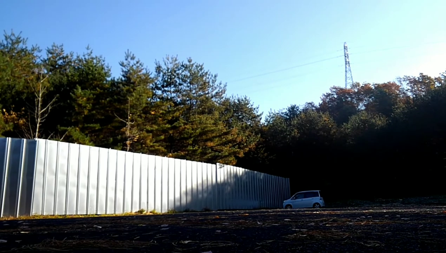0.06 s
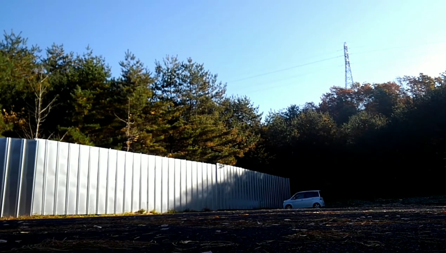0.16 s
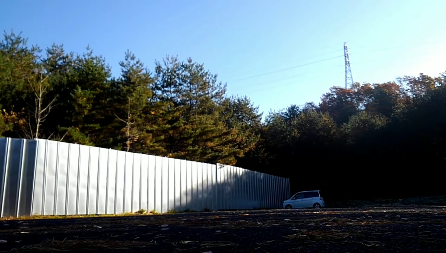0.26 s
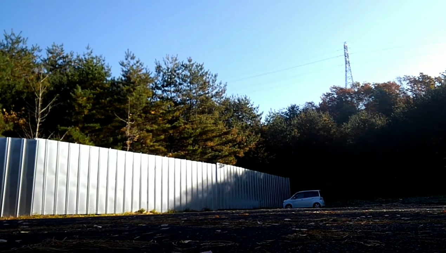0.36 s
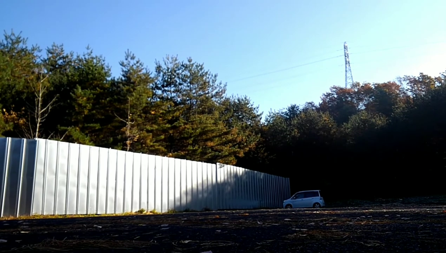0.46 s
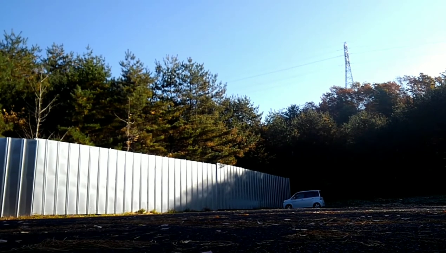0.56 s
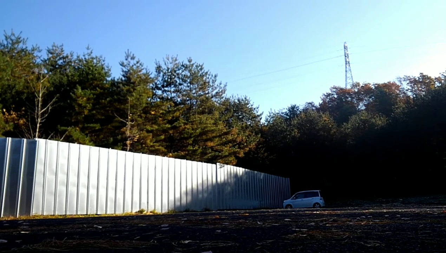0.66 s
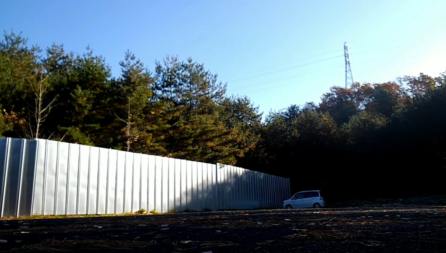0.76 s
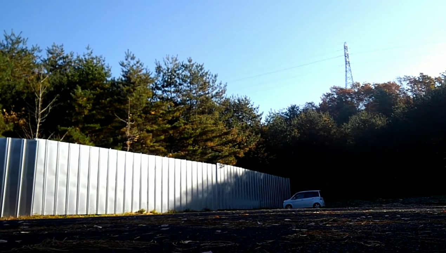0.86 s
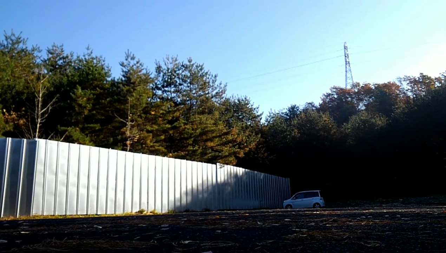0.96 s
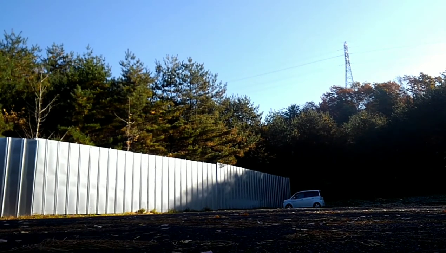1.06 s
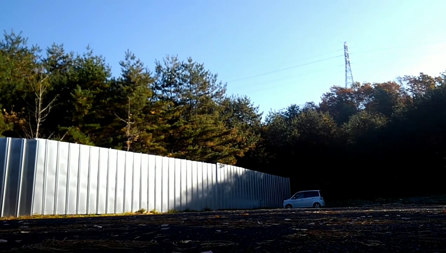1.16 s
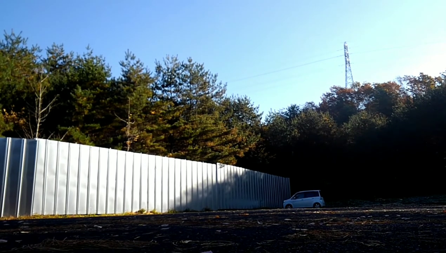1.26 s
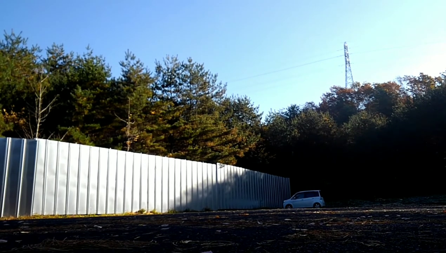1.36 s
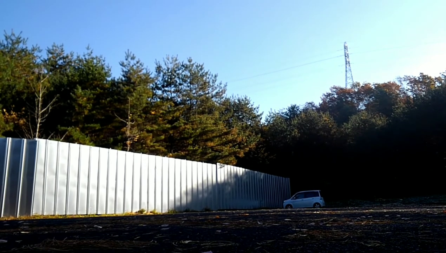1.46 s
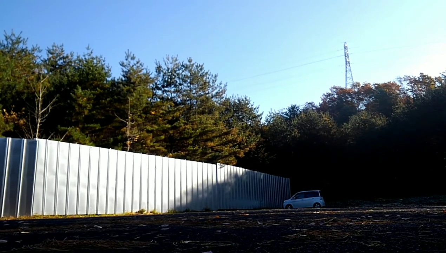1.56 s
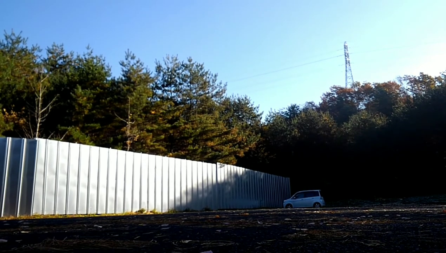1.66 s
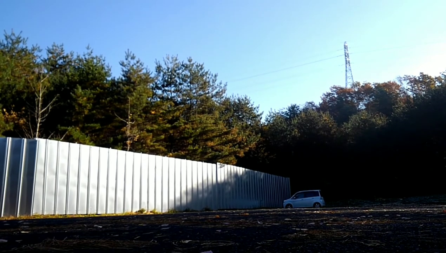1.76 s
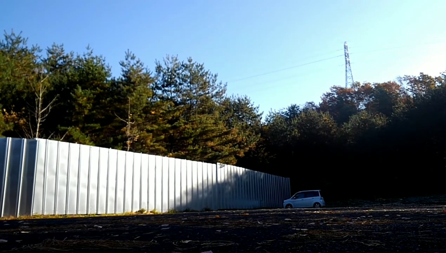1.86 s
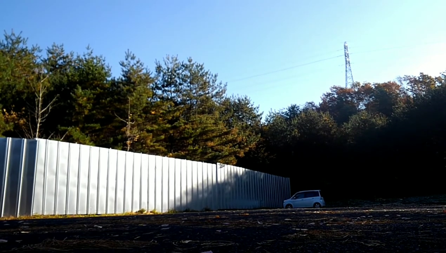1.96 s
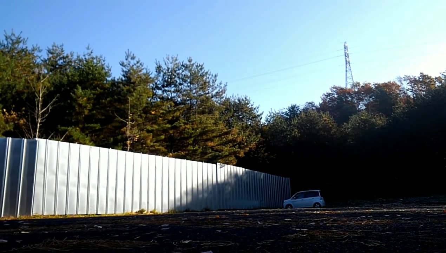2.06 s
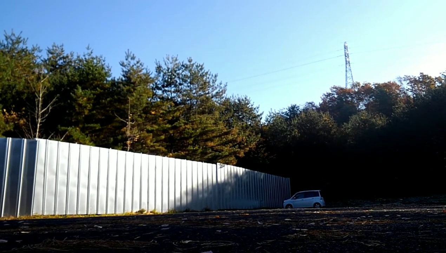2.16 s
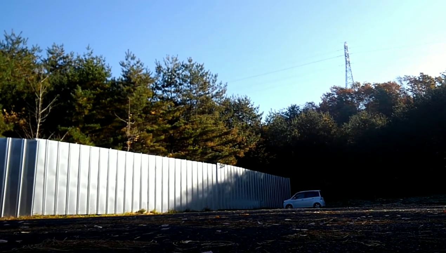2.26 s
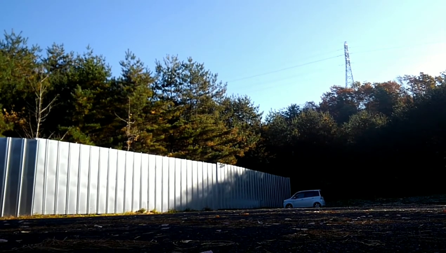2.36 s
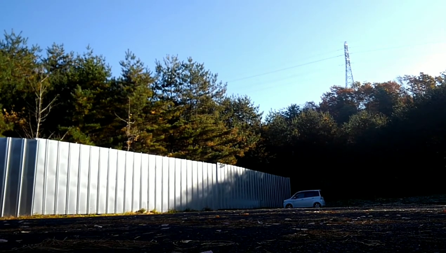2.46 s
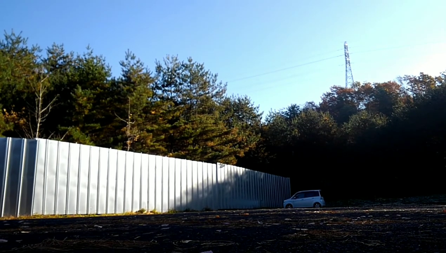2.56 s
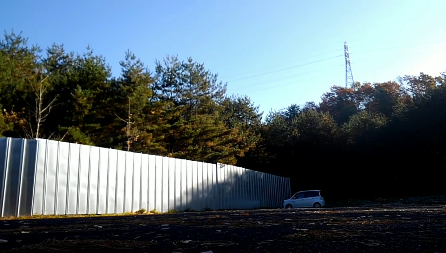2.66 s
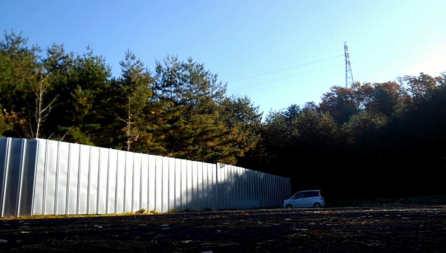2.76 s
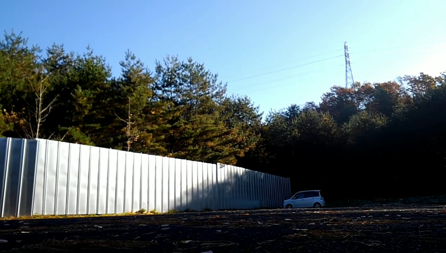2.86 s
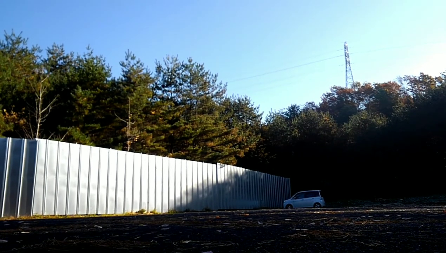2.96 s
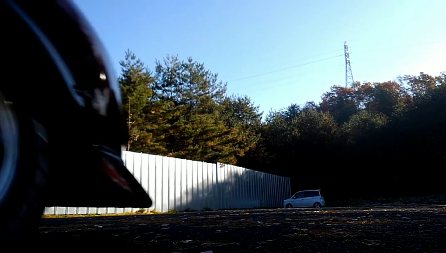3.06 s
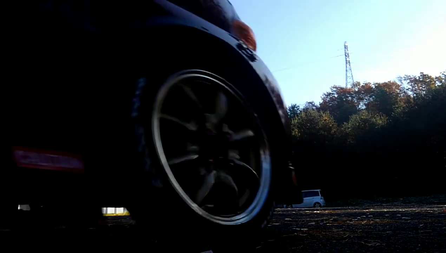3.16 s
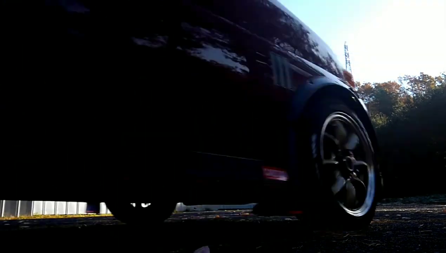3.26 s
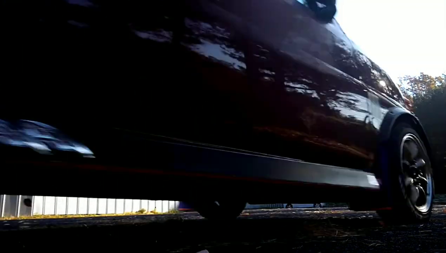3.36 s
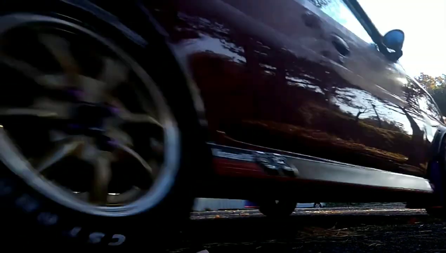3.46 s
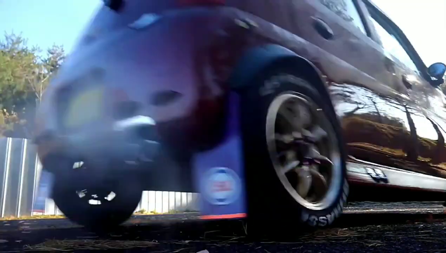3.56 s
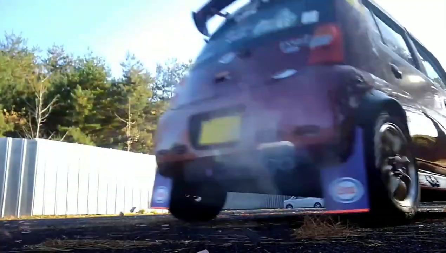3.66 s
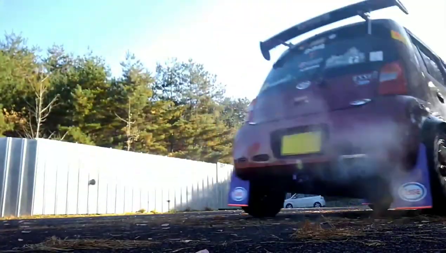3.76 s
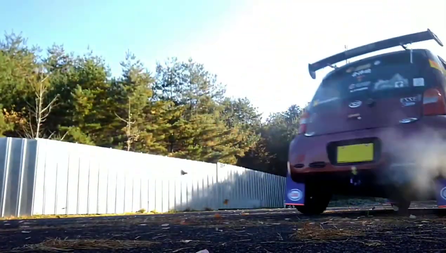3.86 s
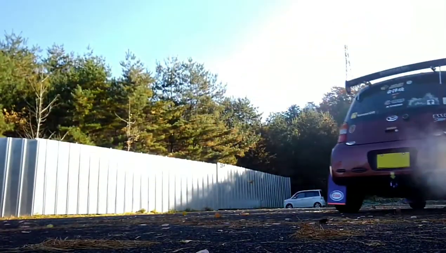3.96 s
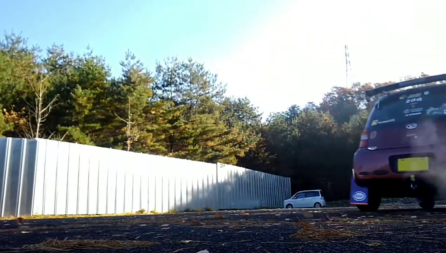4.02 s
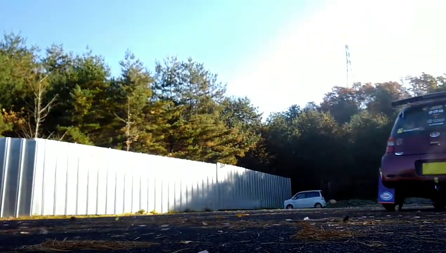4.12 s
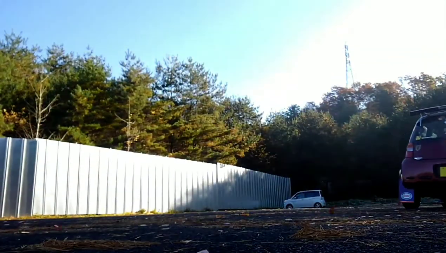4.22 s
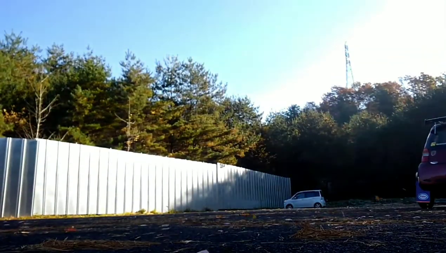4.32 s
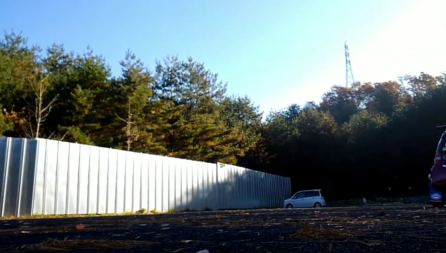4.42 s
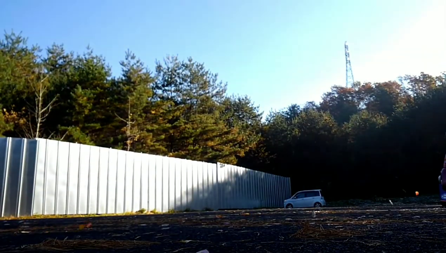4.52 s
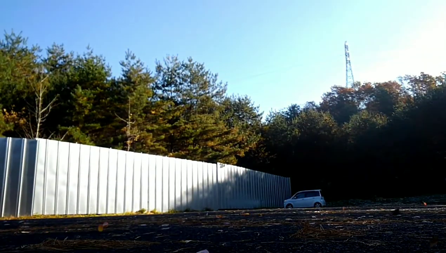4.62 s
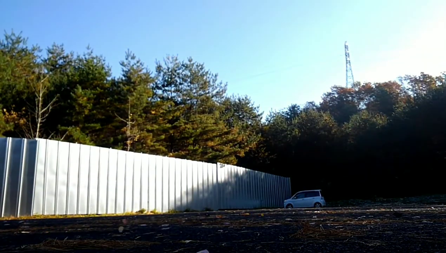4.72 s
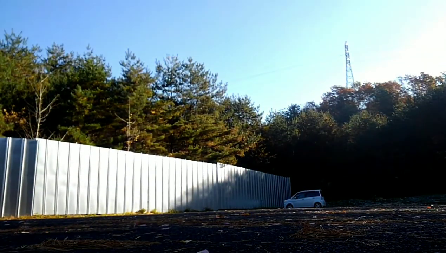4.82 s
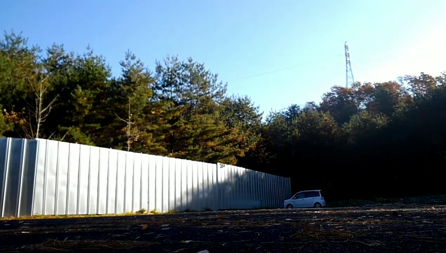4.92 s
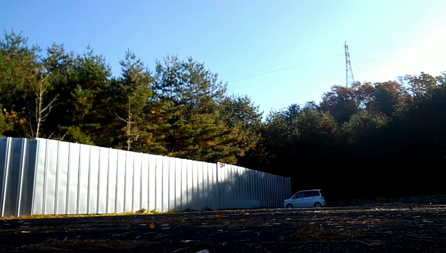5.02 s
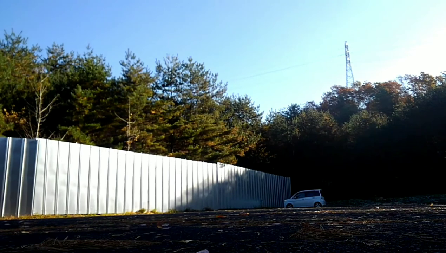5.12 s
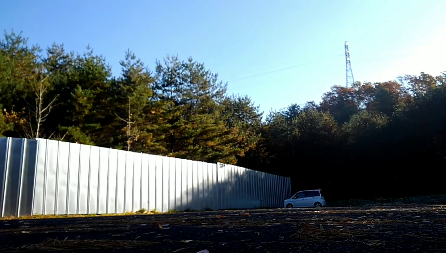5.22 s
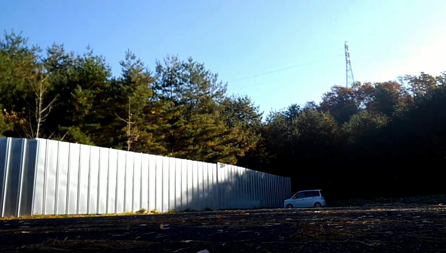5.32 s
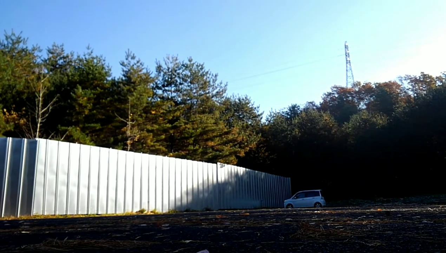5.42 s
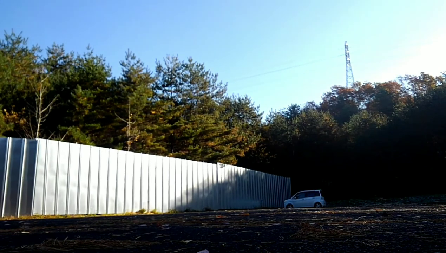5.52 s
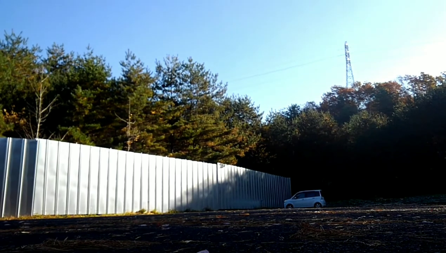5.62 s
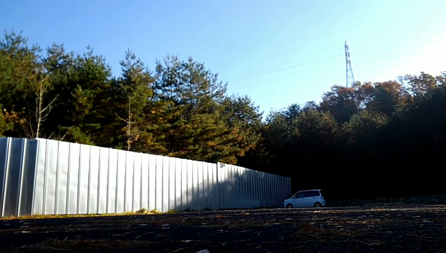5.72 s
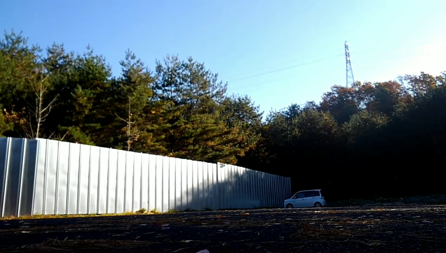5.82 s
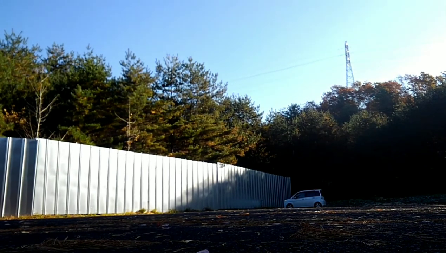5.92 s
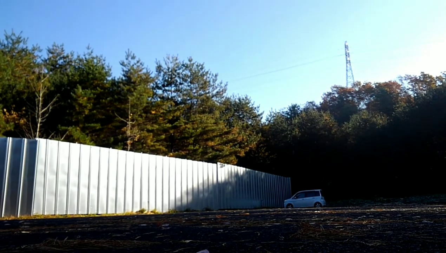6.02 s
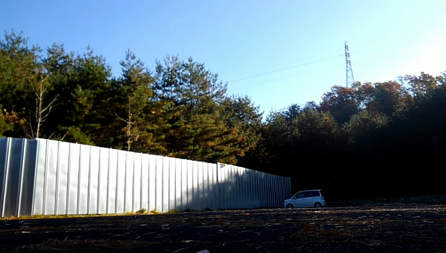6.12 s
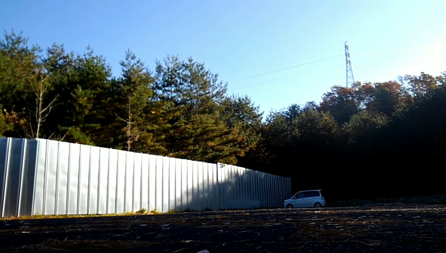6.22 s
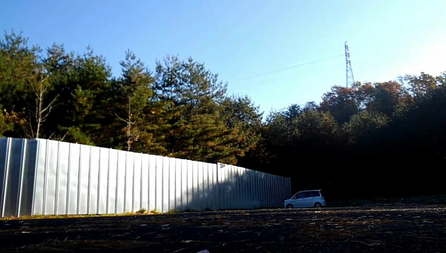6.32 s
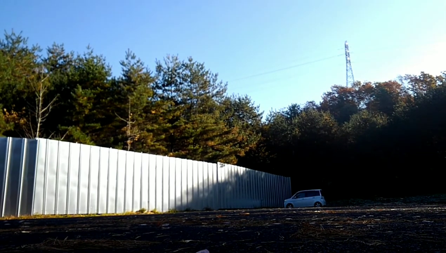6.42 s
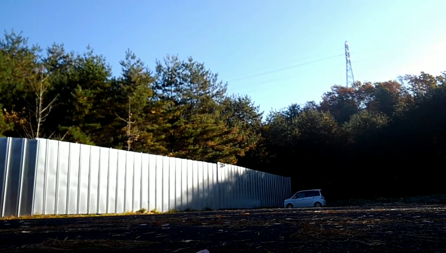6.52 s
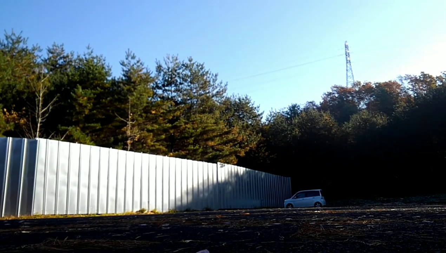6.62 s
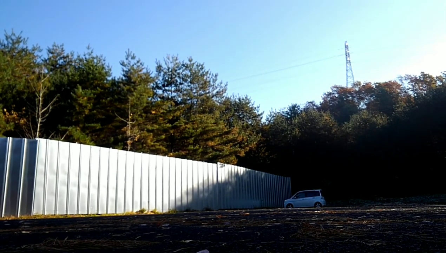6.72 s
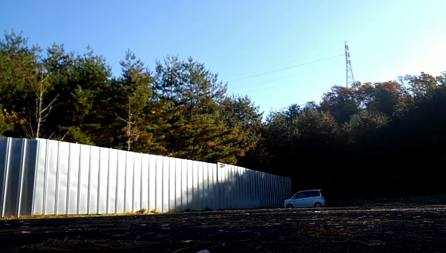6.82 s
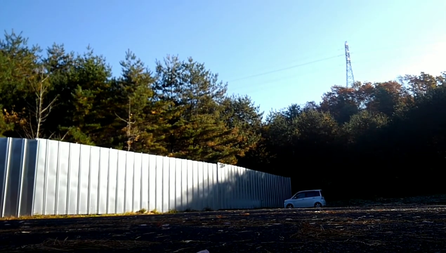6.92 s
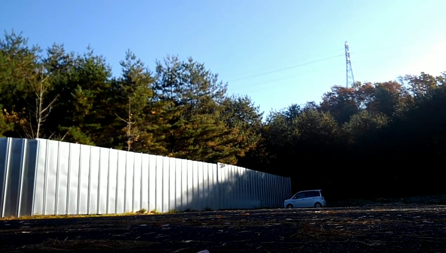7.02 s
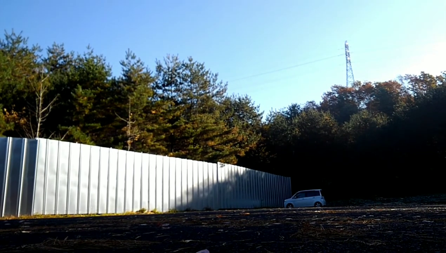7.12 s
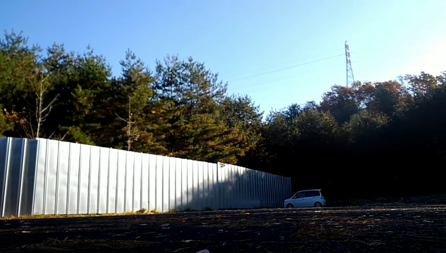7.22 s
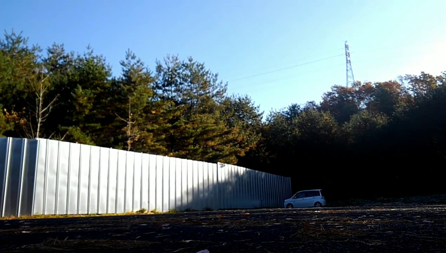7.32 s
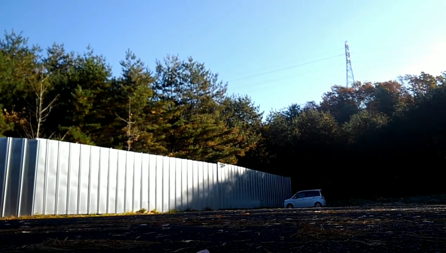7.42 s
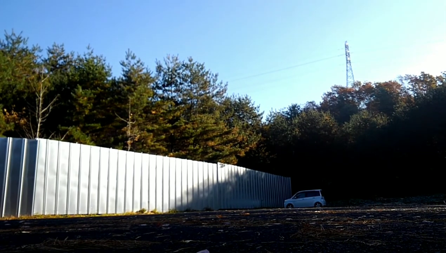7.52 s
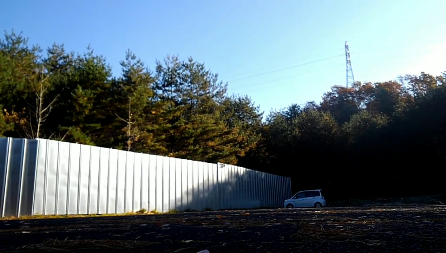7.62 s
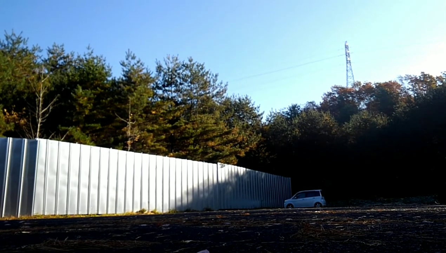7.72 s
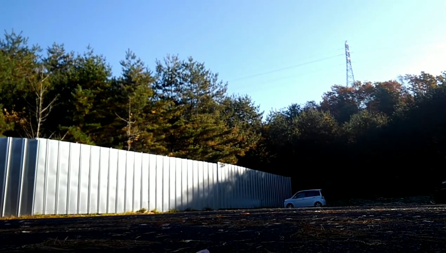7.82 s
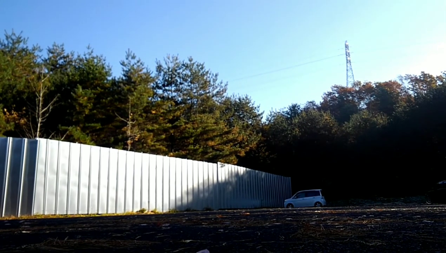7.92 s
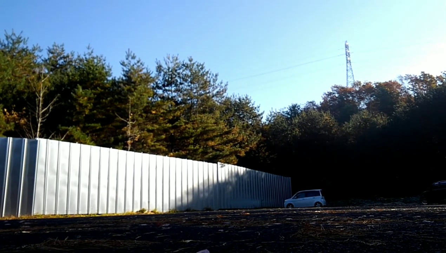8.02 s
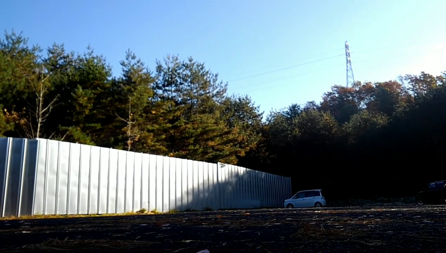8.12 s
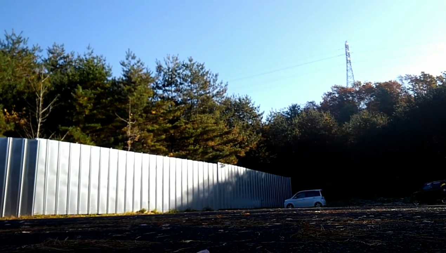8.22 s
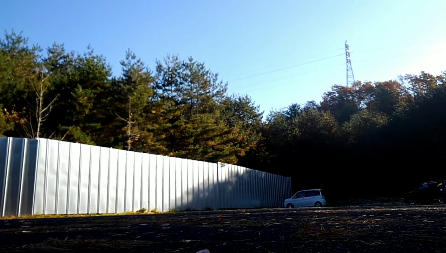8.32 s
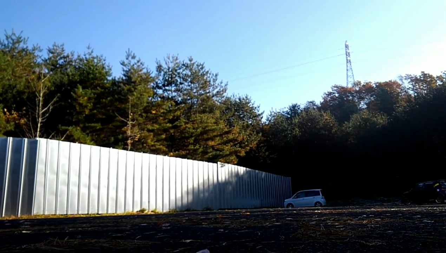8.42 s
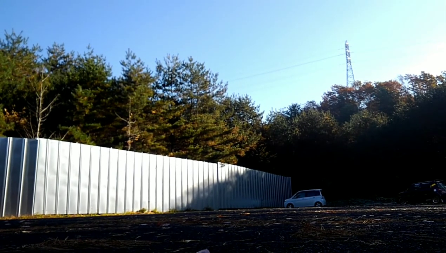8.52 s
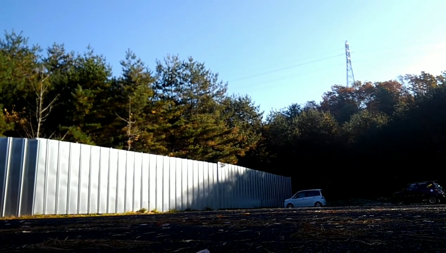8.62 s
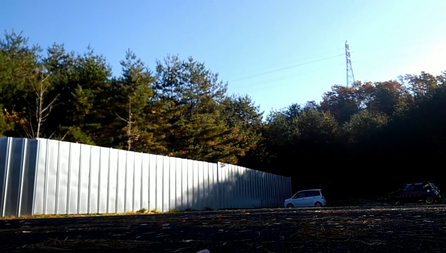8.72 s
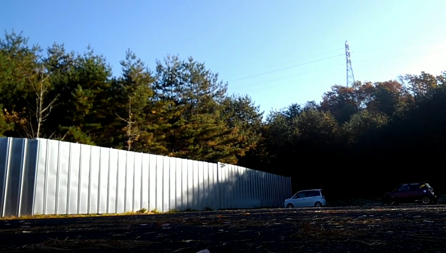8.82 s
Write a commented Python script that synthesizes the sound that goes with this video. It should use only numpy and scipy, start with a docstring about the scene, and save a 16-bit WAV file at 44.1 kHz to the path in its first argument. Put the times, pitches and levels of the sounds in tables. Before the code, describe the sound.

Rising buzzy exhaust and crunching tyres swell into a distorted close pass on gravel, then fade away with falling revs, crackling pops and tree echoes.

```python
"""On a gravel lot with a fence and trees, a small three-cylinder car with a loud exhaust comes up from behind,
passes close to a microphone on the ground and overloads it, then drives off, lifts the throttle and pops far away.
Tones locked to the firings make the boom; firing edges ring the silencer, and edges and puffs of gas the tailpipe.
Shaped noise makes tyres, breeze and open air; short noise bursts make stones and pops; fence and trees echo."""
import sys
import numpy as np
from scipy import signal
from scipy.fft import rfft, irfft, next_fast_len
from scipy.io import wavfile
from scipy.ndimage import uniform_filter1d

SR = 44100
rng = np.random.default_rng(int(sys.argv[2]) if len(sys.argv) > 2 else 0)


def transcribe(signal):
    """Save signal, clipped to [-1, 1], as a 16-bit WAV file at the path in sys.argv[1]."""
    frames = np.atleast_2d(signal).T
    limited = np.clip(frames, -1, 1)
    pcm = np.round(limited * 32767).astype(np.int16)
    wavfile.write(sys.argv[1], SR, pcm)


N = 391595
T = np.arange(N) / SR
SIZE = next_fast_len(N + SR)  # room for echoes to ring out
HZ = np.maximum(np.arange(SIZE // 2 + 1) * SR / SIZE, 1e-3)
TOP_HZ = 15600  # where the treble ends

# The drive past: moment of passing, speed, closest distance, and when the car turns its tail to the microphone.
PASS_S, SPEED_M_S, CLOSEST_M = 3.475, 3.616, 2.286
FACING_AWAY_S = (3.46, 4.03)

# Engine speed. Each row: time in seconds, firing rate in Hz.
FIRING_RATE = [(0, 39.8), (.11, 40), (.29, 51.6), (.52, 51.4), (.8, 60.6), (1.02, 58.1), (1.25, 64.3),
               (1.48, 64.4), (1.78, 68.5), (2.16, 76.6), (2.36, 82.8), (2.57, 86.7), (2.97, 98.3),
               (3.14, 101.8), (3.38, 110.1), (3.59, 112.6), (3.81, 118.9), (3.92, 120.5), (4.15, 128.4),
               (4.42, 130), (4.58, 124.2), (4.8, 132.4), (4.9, 125.8), (5.12, 117.5), (5.26, 121.2),
               (5.33, 121.7), (5.62, 108.6), (5.85, 105), (6.36, 82), (6.58, 76.2), (6.82, 65.2),
               (7.07, 58.7), (7.37, 54.7), (7.62, 54.5), (7.9, 51.5), (8.02, 52.4), (8.41, 49),
               (8.61, 51.1), (8.88, 50.6)]
# How hard the engine pulls. Each row: time in seconds, effort in dB, which each voice scales its own way.
ENGINE_EFFORT = [(0, -0.5), (.7, 0.5), (1.05, -1), (2.15, -1), (2.75, 1.13), (3.08, 3.5), (4.28, 3.5),
                 (5.5, 5), (6.25, 3.5), (6.6, 2), (7.05, -3), (7.92, -6), (8.4, -2), (8.88, -1)]
# Quick lifts of the throttle. Each row: start, closing time, held time and reopening time in seconds, depth in dB.
THROTTLE_LIFTS = [(4.3, .12, .05, .025, 5.5), (4.797, .015, .08, .22, 3.5), (7.87, .03, .07, .03, 8)]
# Extra unevenness of the firing times. Each row: middle and half length in seconds, spread in cycles.
FIRING_FLUTTER = [(3.15, .19, .022), (4.9, .1, .035), (5.5, 1, .006), (6.7, .35, .012)]

# The three lowest exhaust tones, before the boom filters. Each row: level in dB from ahead, level in dB from behind,
# dB per dB of effort, loss in dB per doubling of distance.
LOW_TONES = [(-29, -27, 0, 11.5), (-23.5, -29, 5, 10.5), (-4, 0, 1, 17)]
# How the exhaust favours low tones, from ahead and from behind. Each row: frequency in Hz, gain in dB.
BOOM_AHEAD_TONE = [(70, -2), (90, 5), (105, 18.5), (120, 18), (138, 1), (165, 7), (188, -0.5), (205, -0.5),
                   (235, 0), (280, -52)]
BOOM_BEHIND_TONE = [(50, 5), (56, 17.5), (70, 17.5), (85, 17), (106, 24.5), (120, 21), (150, 9.5),
                    (200, -10.5), (262, -4.5), (320, -28.5)]
# The boom drops out as the body goes by. Each row: middle and half length in seconds, depth in dB.
BODY_SHADOW = [(3.397, 0.021, 17)]

# Level of rushing gas against the firing edges. Each row: time in seconds, level in dB.
GAS_RUSH = [(1, 5), (3.2, 2), (3.45, -7), (4.3, -8), (4.5, 6)]
# Level of the silencer's drone, which swells as the revs cross its notes and as the far car turns round.
# Each row: time in seconds, level in dB before the throttle lifts.
SILENCER_DRONE = [(0,-39.5),(.3,-32.5),(.52,-33.5),(.68,-30),(1.08,-35),(1.3,-29.5),(1.82,-24.5),(2.1,-35.5),(2.55,-19.5),(2.78,-23.5),(2.97,-12.5),(3.2,-16.5),(3.5,-5.5),(3.75,-7),(4.05,-38),(4.3,-44),(4.55,-35),(6.3,-40.5),(6.58,-27),(6.76,-38.5),(6.9,-30.5),(7.1,-44),(7.55,-42),(7.9,-45.5),(8.25,-37),(8.42,-32),(8.65,-35.5),(8.88,-43)]
# Exhaust tone from ahead, close behind and far behind. Each row: frequency in Hz, gain in dB.
EXHAUST_AHEAD = [(400,-7),(495,24),(550,16),(615,19),(680,19.5),(880,9),(1000,5),(1200,12),(1450,-14),(2100,-17),(2400,4.5),(2750,-3.5),(3400,-1.5),(4800,-20)]
EXHAUST_CLOSE = [(460,7),(510,4.5),(590,7.5),(790,0.5),(885,2.5),(1150,-18.5),(1400,-6),(1700,4.5),(2350,-4.5),(3100,-0.5),(4200,-5),(5000,-18)]
EXHAUST_FAR = [(400,2),(485,10),(660,1),(830,-7),(1050,-7.5),(1220,-21),(1600,-11),(2350,-8),(2550,-22),(2900,-14.5),(4200,-19),(8000,-40)]
# Voices of the car. Each holds the same four numbers as a row of LOW_TONES.
BARK = (-23.5, -22, 2.19, 8)
BLARE = (-37, -30.5, 3.5, 11.5)
RASP = (-33, -28, 1.5651, 11)
JET_HISS = (-56, -52, 3.5, 18)
TYRE_HISS = (-45.5, -45, 0.5, 12.5)
DRAUGHT = (-52, -52, 4, 12.5)
# Brief swells: labouring engine, rasp with the tailpipe aimed at the microphone, tyres biting as the car speeds up.
# Each holds: middle and half length in seconds, then level (labouring) or rise (the others) in dB.
LUG = (0.22, 0.22, -32.5)
AIMED = (3.79, 0.29, 9.5)
GRIP = (0.77, .18, 3.6)

# Tyre noise before the wheel ringing. Each row: frequency in Hz, gain in dB.
GRAVEL_TONE = [(100,30.5),(1000,28),(3200,19.5),(5000,9.5),(8500,-3.5),(13000,-3.5)]
# Tyre noise falls once the driven wheels are past. Each row: time in seconds, change in dB.
DRIVEN_WHEELS = [(3.42, 0), (3.55, -5), (4.4, -7), (7, -3)]
# Ringing notes of wheels and body panels, in Hz.
WHEEL_RING_HZ = (1200, 2400, 3380)
# Open air and distant traffic. Each row: frequency in Hz, gain in dB.
OPEN_AIR_TONE = [(25,-20),(100,3),(400,3),(1000,-6),(2500,-15),(4200,-19),(15000,-52)]
# Stones flicked by the tyres. Each row: start in seconds, peak in dB, ringing note in Hz.
FLICKED_STONES = [(.362,-36.5,2980),(.890,-42,4700),(2.952,-26,8290),(3.652,-10,6960),(3.698,-26,7500)]
# Single engine tones that sing out. Each row: middle and half length in seconds, level in dB,
# multiple of the firing rate.
SINGING_TONES = [(2.1, .27, -45, 16.2), (2.52, .14, -42, 14.2), (3.4, .07, -27, 11), (3.68, .1, -19, 4)]
# Unburnt fuel pops in the pipe; the first row is a thump from a gear change or a bump. Each row: start in
# seconds, peak in dB before filtering, centre in Hz.
POPS_AND_THUMP = [(4.468,-11,100),(4.797,-15,380),(4.872,-19,380),(5.006,-17,300),(6.768,-26,500),(6.839,-24,500),(6.886,-16,400),(6.921,-16,350)]


def undb(db):
    """Turn decibels into gain."""
    return 10 ** (np.asarray(db) / 20)


def curves(table):
    """Join each column of a table by straight lines in time."""
    s, *columns = np.transpose(table)
    return [np.interp(T, s, c) for c in columns]


def noise():
    """White noise."""
    return rng.standard_normal(N)


def unit(x):
    """Scale to an rms level of 1."""
    return x / np.std(x)


def even(x, size=3500):
    """Hold the short-term rms at 1 but keep the single firings; size is in samples."""
    power = uniform_filter1d(uniform_filter1d(x * x, size), size)
    return x / np.sqrt(np.abs(power) + 1e-12)


def shape(x, response):
    """Filter by a frequency response."""
    return irfft(rfft(x, SIZE) * response, SIZE)[:N]


def colour(points):
    """Frequency response drawn through (Hz, dB) points."""
    hz, db = np.transpose(points)
    return undb(np.interp(np.log(HZ), np.log(hz), db))


def band(low_hz, high_hz, order=8):
    """Response that passes only a band; a higher order makes steeper sides."""
    low_side = (low_hz / HZ) ** (2 * order)
    high_side = (HZ / high_hz) ** (2 * order)
    return 1 / np.sqrt((1 + low_side) * (1 + high_side))


def resonance(hz, width_hz):
    """Response of one damped ringing note."""
    return 1 / (1 + 1j * (HZ ** 2 - hz ** 2) / (HZ * width_hz))


def delay(seconds):
    """Response of a pure delay."""
    return np.exp(-2j * np.pi * HZ * seconds)


def walk(rate_hz):
    """Smooth random wandering with a spread of 1."""
    return unit(shape(noise(), 1 / (1 + (HZ / rate_hz) ** 4)))


def swell(s, length, peak):
    """A smooth brief rise and fall around time s."""
    return peak * np.exp(-((T - s) / length) ** 2)


def dips(table):
    """Smooth brief drops of level, in dB."""
    return -sum(swell(*row) for row in table)


def echoes(x, t60=0.75, gap_s=0.0033):
    """Scatter from ribbed fence and trees: a fading noise tail, late and dull."""
    onset = np.clip(T / gap_s - 1, 0, 1)
    tail = noise() * undb(-60 * T / t60) * onset
    return shape(x, rfft(tail / np.linalg.norm(tail), SIZE) * band(59, 5000, order=1))


def bursts(table, decay_s, width):
    """Short fading bursts of noise, each through its own broad resonance."""
    out, t = np.zeros(N + SR), T[:SR // 8]
    for s, db, hz in table:
        b, a = signal.iirpeak(min(hz, SR / 4), max(1 / width, .7), fs=SR)
        burst = signal.lfilter(b, a, rng.standard_normal(len(t)) * np.exp(-t / decay_s))
        start = int(s * SR)
        out[start:start + len(t)] += undb(db) * burst / np.abs(burst).max()
    return out[:N]


def facing_away():
    """0 while the car points at the microphone, 1 once its tailpipe does."""
    return np.interp(T, FACING_AWAY_S, (0, 1))


def loudness(ahead_db, behind_db, per_effort, loss_db):
    """Gain of one voice of the car, from its heading, its effort and its distance."""
    distance_m = np.hypot(CLOSEST_M, SPEED_M_S * (T - PASS_S))
    doublings = np.log2(distance_m / CLOSEST_M)
    heading_db = ahead_db + (behind_db - ahead_db) * facing_away()
    return undb(heading_db + per_effort * curves(ENGINE_EFFORT)[0] - loss_db * doublings)


def lifts():
    """Drop of level in dB while the throttle is shut."""
    total = np.zeros(N)
    for s, fall, hold, rise, db in THROTTLE_LIFTS:
        total -= np.interp(T, s + np.cumsum([0, fall, hold, rise]), (0, db, db, 0))
    return total


def flutter():
    """Spread of the firing times in cycles: always a little, more in the rough stretches."""
    return .0015 + sum(swell(*row) for row in FIRING_FLUTTER)


def firings(turns, scatter_db, cylinder_db, count=3):
    """Strength of each firing: the three cylinders differ, and every burn differs a little."""
    shot = np.round(turns).astype(int)
    db = scatter_db * rng.standard_normal(N // 100)[shot] + cylinder_db * (shot % count - 1)
    return uniform_filter1d(undb(db), size=60)


def boom(turns, echo_db=-17):
    """Three lowest tones of the pulse train, each swelling as the revs carry it through a resonance."""
    tones = sum(np.cos(2 * np.pi * k * turns) * loudness(*row) for k, row in enumerate(LOW_TONES, 1))
    tones = np.sqrt(2) * tones * firings(turns, scatter_db=-0.18, cylinder_db=-0.36)
    away = np.interp(T, (3.3, 3.6), (0, 1))
    # from ahead the pulses arrive as ramps, from behind as spikes
    ahead = shape(tones, 1j * colour(BOOM_AHEAD_TONE))
    behind = shape(tones, colour(BOOM_BEHIND_TONE))
    heard = (1 - away) * ahead + away * behind
    return heard * undb(dips(BODY_SHADOW)) + undb(echo_db) * echoes(heard)


def firing_edges(turns, count=52):
    """Sharp edge of each firing, built from many harmonics with slightly uneven timing."""
    angle = 2 * np.pi * (turns + flutter() * walk(30))
    # the edge is not perfectly sharp, so its highest harmonics fade away
    edges = sum(np.cos(k * angle) * np.cos(np.pi / 2 * k / count) for k in range(3, count))
    return unit(edges) * firings(turns, scatter_db=.9, cylinder_db=.9)


def gas_puffs(turns):
    """Turbulent gas hisses after each firing, in short uneven puffs that crackle."""
    puff = .25 + np.exp(-(turns % 1) / .16)
    puff = puff * firings(turns, scatter_db=2, cylinder_db=2)
    return unit(noise() * puff) * undb(curves(GAS_RUSH)[0])


def underbody():
    """Response of sound bouncing between floor pan and ground, which spreads each pulse in time."""
    bounce = delay(.0034)
    return (bounce - .55) / (1 - .55 * bounce)


def silencer(edges):
    """The silencer rings on between firings: three notes from ahead, two from behind."""
    away = facing_away()
    # a side chamber swallows one pitch
    push = shape(edges, band(170, 426) * (1 - resonance(385, 50)))
    notes_ahead = resonance(268, 35) + resonance(330, 30) + .4 * resonance(420, 22)
    notes_behind = 0.5 * resonance(304, 31) + resonance(338.3, 18.7)
    ring = (1 - away) * shape(push, notes_ahead * underbody()) + away * shape(push, notes_behind)
    return even(ring + undb(-13) * echoes(ring)) * undb(curves(SILENCER_DRONE)[0])


def labouring(edges):
    """A low growl as the engine labours while the clutch takes up the load."""
    s, length, db = LUG
    return even(shape(edges, band(154, 212))) * swell(s, length, undb(db))


def fence(x):
    """One hard reflection whose lag slides as the car goes by, so the harmonics ripple and beat."""
    lag_s = .014 + .005 * np.tanh((T - 3.1) / .5) + .0012 * (T - PASS_S)
    gain = np.interp(T, (2.3, 2.9, 3.4, 3.7, 5), (.45, .75, .7, .15, .4))
    return x + gain * np.interp(T - lag_s, T, x)


def tailpipe(edges, gas, far):
    """Waves return inverted from the open pipe end, making quarter-wave resonances; the fence reflects them."""
    standing = 1 / (1 + 0.3 * delay(.00545))
    jet = shape(edges + shape(gas, band(480, SR, order=2)), standing)
    rear = (1 - far) * shape(jet, colour(EXHAUST_CLOSE)) + far * shape(jet, colour(EXHAUST_FAR))
    front = shape(jet, colour(EXHAUST_AHEAD) * underbody())
    in_view = np.interp(T, (3.35, 3.6), (0, 1))  # the tailpipe clears the body
    return fence((1 - in_view) * front + in_view * rear)


def tree_echoes(mouth):
    """The forest edge answers late, still at the earlier pitch; far off, the echoes weigh more."""
    forest = shape(mouth, delay(0.29) * band(210, 1700, order=1))
    wet_db = np.interp(T, (0, 3.6, 4.8, 5.6, 7), (-10, -27, -18, -8, -4))
    return undb(wet_db) * (forest + echoes(mouth))


def pipe(turns):
    """Firing edges ring the silencer, edges and gas the tailpipe; drone and growl have their own levels."""
    edges = firing_edges(turns)
    far = np.interp(T, (4.35, 4.55), (0, 1))
    mouth = tailpipe(edges, gas_puffs(turns), far)
    wet = tree_echoes(mouth)
    # bark, blare, rasp and hiss follow heading, effort and distance
    bark = even(shape(mouth + wet, band(392, 802))) * loudness(*BARK)
    blare = even(shape(mouth + wet, band(867, 1230))) * loudness(*BLARE)
    # the trees return less of the treble, which stays crisp
    treble = shape(mouth + wet / 2, band(1393, SR) * band(20, 5340, order=3))
    rasp = even(treble) * loudness(*RASP) * undb(swell(*AIMED))
    hiss = unit(shape(noise(), band(6500, TOP_HZ, order=2))) * loudness(*JET_HISS) * (1 - far)
    return silencer(edges) + labouring(edges) + bark + blare + rasp + hiss


def tyres():
    """A rolling roar of noise with countless small grains of grit cracking in it."""
    grain_size = undb(0.82 * np.minimum(rng.exponential(size=N), 5))
    grit = noise() * (rng.random(N) < 900 / SR) * grain_size  # about 900 grains a second
    # wheels and body panels ring a little under the grit
    ringing = 1 + .8 * sum(resonance(hz, hz / 25) for hz in WHEEL_RING_HZ)
    roll = shape(noise() + 0.43 * unit(grit), ringing * colour(GRAVEL_TONE) * band(95, TOP_HZ, order=4))
    # the level is set by the hiss at the top of the roar
    hiss = np.std(shape(roll, band(8000, 15000)))
    change_db = 0.91 * walk(11) + swell(*GRIP) + curves(DRIVEN_WHEELS)[0]
    return roll / hiss * loudness(*TYRE_HISS) * undb(change_db)


def wind(breeze_db=-47.5):
    """Low noise for a light breeze and the air that the passing body pushes over the microphone."""
    gusts = (undb(breeze_db) + loudness(*DRAUGHT)) * undb(2 * walk(5.4))
    return unit(shape(noise(), band(14, 71, order=1) * band(5.8, 570, order=2))) * gusts


def open_air():
    """Steady soft noise of open air and distant traffic."""
    return unit(shape(noise(), colour(OPEN_AIR_TONE))) * undb(-46.5)


def stones():
    """Flicked stones click: each is a very short ringing burst."""
    return bursts(FLICKED_STONES, decay_s=.0022, width=.5)


def singing(turns):
    """Single multiples of the firing rate sing out as the revs sweep them through a resonance."""
    tones = np.zeros(N)
    for s, length, db, order in SINGING_TONES:
        tones += np.cos(2 * np.pi * order * turns) * undb(db) * swell(s, length, 1)
    return np.sqrt(2) * tones * firings(turns, scatter_db=1, cylinder_db=-2.5)


def pops():
    """Fuel burning in the pipe, and one thump of a gear change or a bump: each is a thump with a dry crack on
    top, and echoes."""
    thump_and_crack = band(40, 700, order=3) + undb(-9) * band(1400, 2600, order=3)
    dry_pops = shape(bursts(POPS_AND_THUMP, decay_s=.011, width=.9), thump_and_crack)
    return dry_pops + undb(-8) * echoes(dry_pops)


def scene():
    """Car, stones, wind and open air at one microphone."""
    turns = np.cumsum(curves(FIRING_RATE)[0]) / SR  # firings counted so far
    exhaust = (boom(turns) + pipe(turns) + singing(turns)) * undb(lifts())
    return (exhaust + tyres() + wind() + open_air() + stones() + pops())[None]


def record(dry, ceiling=0.82, order=8):
    """The microphone overloads with flat tops, and the treble ends steeply."""
    clipped = dry / (1 + (dry / ceiling) ** order) ** (1 / order)
    treble_end = signal.ellip(8, .2, 70, TOP_HZ, fs=SR, output="sos")
    return signal.sosfilt(treble_end, clipped)


dry = scene()
out = record(dry)
transcribe(out)
```